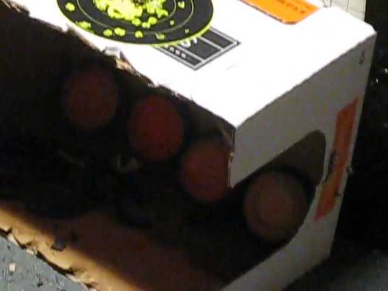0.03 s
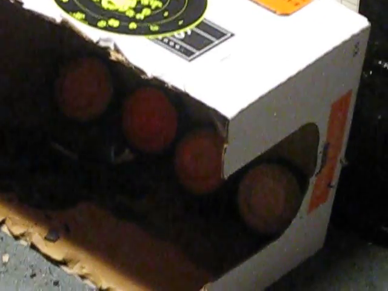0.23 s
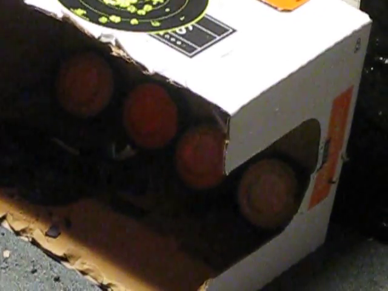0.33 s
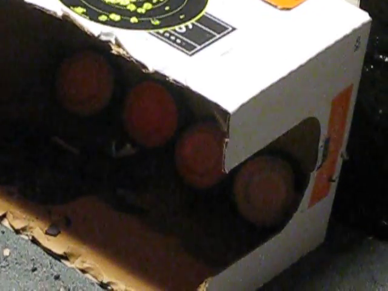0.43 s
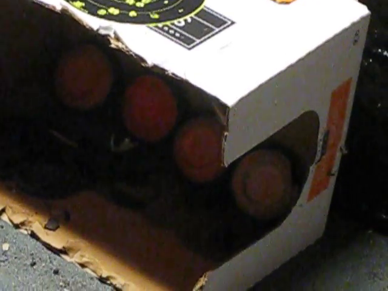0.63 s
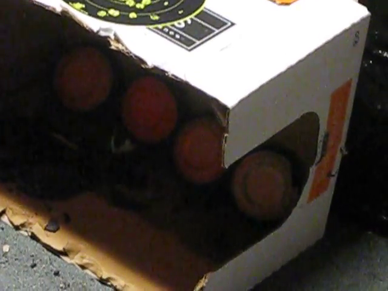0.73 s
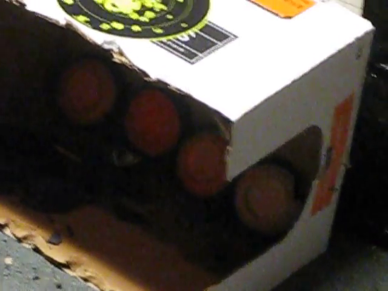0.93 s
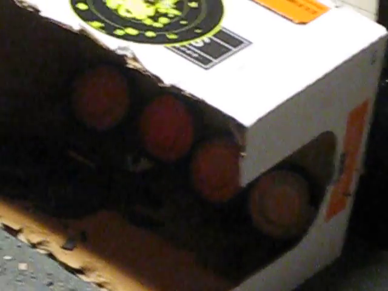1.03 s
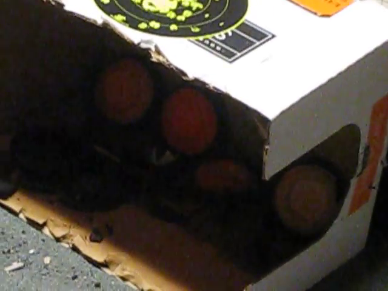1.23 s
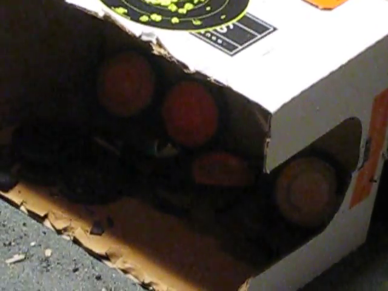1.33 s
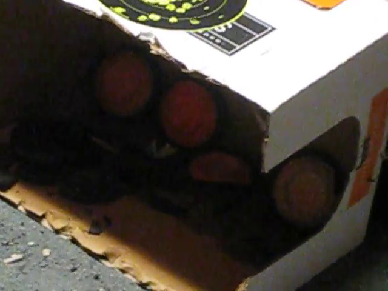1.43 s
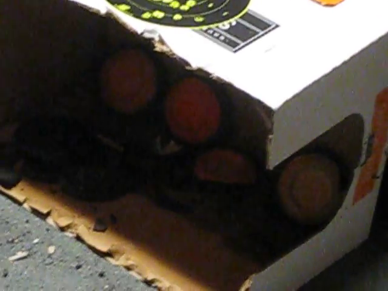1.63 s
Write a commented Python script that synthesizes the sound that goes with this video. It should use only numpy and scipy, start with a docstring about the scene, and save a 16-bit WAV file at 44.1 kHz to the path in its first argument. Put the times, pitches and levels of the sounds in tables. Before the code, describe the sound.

Far metal rings, then an air pistol snaps and hollow knocks and clay chips follow. A second shot brings clinks, a dropping disc and soft cardboard thuds, over low room hum, through a compressing camera microphone.

```python
"""A hard-walled room, where two air pistol shots are fired at clay targets in a cardboard box.
Far metal, a sum of decaying modes and noise, rings before the first shot. Each shot is a hammer click, a
noise blast, a low pulse and echoes. After each, filtered noise makes pieces tumble, knock and tick, and
clay clinks by its modes; after the second a clay disc drops with thuds of the cardboard floor's modes.
Room air and a low hum lie beneath. The camera's gain ducks under loud sound and recovers."""
import sys
import numpy as np
from scipy import signal
from scipy.fft import rfft, irfft, next_fast_len
from scipy.io import wavfile

SR = 44100
rng = np.random.default_rng(int(sys.argv[2]) if len(sys.argv) > 2 else 0)


def bounce(signal):
    """Save signal as a 16-bit WAV file at the path given by the first command-line argument."""
    frames = np.transpose(np.atleast_2d(signal))
    limited = np.clip(frames, -1, 1)
    pcm = np.round(limited * 32767).astype(np.int16)
    wavfile.write(sys.argv[1], SR, pcm)


N = 74970
T = np.arange(N) / SR  # time in seconds

# Bright colour of small hard contacts. Each row: frequency in Hz, relative level in dB.
TICK_SPECTRUM = [(1500, -13), (4000, -8), (6500, -3.5), (9500, -3.5), (13000, -1), (15000, -5),
                 (17500, -34)]


def amp(db):
    """Logarithmic level: decibels to amplitude gain."""
    return 10 ** (np.asarray(db) / 20)


def unit(x):
    """Normalisation: scaled to rms 1."""
    return x / np.sqrt(np.mean(x ** 2) + 1e-20)


def along(points, hz):
    """Logarithmic frequency scale: interpolates (Hz, value) points along it."""
    f, v = np.transpose(points)
    return np.interp(np.log(hz + 1), np.log(f + 1), v)


def filtered(x, response):
    """Convolution theorem: the spectrum of x times a response of frequency."""
    m = 2 * next_fast_len(N // 2 + 4096, True)  # padded
    return irfft(rfft(x, m) * response(np.fft.rfftfreq(m, 1 / SR)), m)[:N]


def coloured(x, spectrum):
    """Minimum phase: a causal filter of unit energy, found by folding the cepstrum."""
    def response(hz):
        log_gain = np.log(unit(amp(along(spectrum, hz))))
        cepstrum = irfft(log_gain)
        half = len(cepstrum) // 2
        cepstrum[1:half] *= 2
        cepstrum[half + 1:] = 0
        return np.exp(rfft(cepstrum))
    return filtered(x, response)


def shifted(spectrum, pitch):
    """Scaling: the same colour with every frequency times a factor."""
    return [(hz * pitch, db) for hz, db in spectrum]


def fade(t, t60):
    """Exponential decay: full level until t = 0, then 60 dB down per t60."""
    return np.exp(-np.log(1000) * np.clip(t / t60, 0, 4))


def burst(s, db, t60, hold=0):
    """Impulsive noise: a sudden start at s, an optional hold, then exponential decay."""
    return amp(db) * (T >= s) * fade(T - s - hold, t60) * rng.standard_normal(N)


def ring(s, modes, pitch=1):
    """Modal superposition: damped sinusoids (Hz, dB, t60) started at time s with random phases."""
    t = np.maximum(T - s, 0)
    total = 0
    for hz, db, t60 in modes:
        total += amp(db) * fade(t, t60) * np.sin(2 * np.pi * (hz * pitch * t + rng.random()))
    return (T >= s) * total


def room(x):
    """Diffuse reverberation: convolution with noise whose frequencies decay at their own speeds."""
    build_s = 0.0027
    # Decay of the room. Each row: frequency in Hz, t60 in seconds.
    decay_times = [(150, 1), (1000, 0.57), (3000, 0.74), (8000, 0.54), (15000, 0.27)]
    hz, t, z = signal.stft(rng.standard_normal(SR), SR, nperseg=256)
    envelope = fade(t, along(decay_times, hz)[:, None]) * (1 - np.exp(-t / build_s))
    tail = signal.istft(z * envelope, SR)[1]
    return signal.fftconvolve(x, tail / np.linalg.norm(tail))[:N]


def in_room(x, room_db):
    """Superposition of direct sound and the room's reverberation."""
    return x + amp(room_db) * room(x)


def in_box(x):
    """Reverberation of a small enclosure: direct sound plus quick reflections off cardboard walls."""
    t60, box_db, build_s = 0.19, -3, 0.0024
    tail = fade(T, t60) * (1 - np.exp(-T / build_s)) * rng.standard_normal(N)
    return x + amp(box_db) * signal.fftconvolve(x, tail / np.linalg.norm(tail))[:N]


def background():
    """Stationary sound: broadband noise of the room air and the steady tones of a low machine hum."""
    air_db = -46
    # Tones of the hum. Each row: frequency in Hz, rms level in dB.
    hum_tones = [(120, -54.5), (188, -52)]
    # Colour of the air. Each row: frequency in Hz, relative level in dB.
    air_spectrum = [(25, -32), (60, -11.5), (100, -16), (150, -3.5), (260, -3.5), (450, -4), (1000, -8.5),
                    (1600, -13.5), (2600, -12.5), (6500, -22), (10000, -22.5), (16000, -36)]
    hum = 0
    for hz, db in hum_tones:
        hum += amp(db) * np.sqrt(2) * np.sin(2 * np.pi * (hz * T + rng.random()))
    return hum + amp(air_db) * coloured(rng.standard_normal(N), air_spectrum)


def metal():
    """Modal vibration of far metal: clear modes, a crowd of weak ones and a hiss, with a blurred attack."""
    t60, rise_s = 0.51, 0.0058  # t60 of crowd and hiss, rise time constant
    modes_db, crowd_db, wash_db = -9.5, -22.5, -3  # crowd_db is for each weak mode
    # Blows; the first still rings as the scene opens. Each row: start in seconds, level in dB.
    blows = [(-.14, -16), (.190, -22), (.215, -11)]
    # Clear modes. Each row: frequency in Hz, relative level in dB, t60 in seconds.
    clear_modes = [(853, -3.5, 0.42), (2107, -3, 0.21), (2290, 0, 0.13), (2590, 2, 0.48), (2750, 4.5, 0.15),
                   (3270, -4, 0.13), (3581, -16, 0.23), (3686, -6, .35), (3870, -5, .5), (4650, -13.5, .35),
                   (5385, 6, 0.1), (5600, -4, 0.33), (9500, -0.5, 0.2)]
    # Colour of crowd and hiss. Each row: frequency in Hz, relative level in dB.
    wash_spectrum = [(180, -40), (300, -44), (725, -15), (828, -11.5), (1040, -18), (1230, -10),
                     (3830, -2.5), (7820, -10.5), (12100, -18.5), (15200, -25), (16000, -87)]
    crowd_hz = np.geomspace(900, 14500, 60) * (1 + .02 * rng.standard_normal(60))
    crowd = ring(0, [(hz, crowd_db, t60) for hz in crowd_hz])
    out = np.zeros(N)
    for s, db in blows:
        rise = 1 - np.exp(-np.maximum(T - s, 0) / rise_s)
        delayed_crowd = amp(db) * np.interp(T - s, T, crowd, left=0)
        wash = coloured(burst(s, db, t60) + delayed_crowd, wash_spectrum)
        clear = amp(db + modes_db) * ring(s, clear_modes)
        out += rise * (amp(wash_db) * wash + clear)
    return out


def patter(start, end):
    """Random point process: many little contacts as noise, scaled to rms 1 before gating."""
    rate_per_s, t60, edge_s, scatter_db = 400, 0.015, 0.037, 4
    chance = rng.random(N)
    size = amp(scatter_db * rng.standard_normal(N))
    contacts = (chance < rate_per_s / SR) * size ** 2
    power = signal.lfilter([1], [1, -fade(1 / SR, t60) ** 2], contacts)
    gate = np.clip(np.minimum(T - start, end - T) / edge_s + .5, 0, 1)  # half open at start and end
    return gate * unit(np.sqrt(np.abs(power)) * rng.standard_normal(N))


def tumbling():
    """Dense random impacts: pieces rattle down in the box, with fine chips among them."""
    # Each row: start in seconds, end in seconds, level in dB, level of the fine chips in dB, pitch factor.
    tumbles = [(0.468, 0.52, -32, -45, 0.98), (0.492, 0.567, -23.5, -34, 1.18),
               (0.555, 0.623, -25, -30, 0.94), (0.633, 0.684, -24.5, -42, 0.88),
               (1.219, 1.289, -28.5, -32, 0.95), (1.282, 1.344, -29, -35, 1.22),
               (1.346, 1.405, -49, -43, 1.2)]
    # Colour of pieces. Each row: frequency in Hz before the pitch factor, relative level in dB.
    piece_spectrum = [(90, -26.5), (150, -14), (330, -13.5), (560, -4), (800, -0.5), (1100, -1.5),
                      (1700, -7.5), (3300, -18.5), (7000, -31), (11000, -36)]
    pieces, chips = 0, 0
    for start, end, db, chips_db, pitch in tumbles:
        pieces += amp(db) * coloured(patter(start, end), shifted(piece_spectrum, pitch))
        chips += amp(chips_db) * patter(start, end)
    return in_room(in_box(pieces + coloured(chips, TICK_SPECTRUM)), room_db=-10.5)


def thuds():
    """Plate resonance: the cardboard floor booms in its modes and rustles under the falling disc."""
    rustle_t60, rustle_db = 0.1, -2.5
    # Soft thuds. Each row: start in seconds, level in dB.
    landings = [(1.234, -26), (1.296, -29), (1.317, -29.5), (1.359, -30.5), (1.423, -31), (1.522, -39),
                (1.668, -40)]
    # Modes of the cardboard floor. Each row: frequency in Hz, relative level in dB, t60 in seconds.
    floor_modes = [(166, -6, 0.091), (247.6, 3.5, 0.096), (315, -5, 0.054)]
    # Colour of the rustle. Each row: frequency in Hz, relative level in dB.
    rustle_spectrum = [(40, -18), (110, -11), (170, -6), (250, -4.5), (340, -7), (450, -20), (800, -25),
                       (2000, -42)]
    boom, rustle = 0, 0
    for s, db in landings:
        boom += amp(db) * ring(s, floor_modes)
        rustle += burst(s, db + rustle_db, rustle_t60)
    return in_room(boom + coloured(rustle, rustle_spectrum), room_db=-15)


def clinks():
    """Excitation and resonance: clay on clay makes a gritty contact and a brief ring of modes."""
    grit_t60, grit_db, ring_db = 0.036, 1.5, -6
    # Contacts. Each row: start in seconds, level in dB, pitch factor of the modes.
    clay_contacts = [(.716, -34, 0.7), (0.754, -28.5, .87), (.846, -34, 0.9), (1.331, -15, 1),
                     (1.338, -15.5, 0.9), (1.386, -35.5, 0.74)]
    # Clay modes. Each row: frequency in Hz before the pitch factor, relative level in dB, t60 in seconds.
    clay_modes = [(2850, -8, 0.04), (3260, -6, 0.058), (3330, -7, 0.21), (3600, -28, 0.15),
                  (4160, -6, 0.027), (5792, 5, 0.059), (6010, -2, 0.049), (6480, -14, 0.034)]
    # Colour of the grit. Each row: frequency in Hz, relative level in dB.
    grit_spectrum = [(1500, -45), (2600, 9), (3300, 19), (4600, 1.5), (5900, 8), (7000, 5.5), (12000, -4),
                     (16000, -31)]
    direct = 0
    for s, db, pitch in clay_contacts:
        direct += amp(db + ring_db) * ring(s, clay_modes, pitch)
        direct += coloured(burst(s, db + grit_db, grit_t60), grit_spectrum)
    return in_room(in_box(direct), room_db=-27)


def ticks():
    """Small bodies resonate high: chips land with bright noise, each ringing at three random pitches."""
    ring_db, ring_t60 = -9, 0.02
    # Landings of chips. Each row: start in seconds, level in dB, t60 of the noise in seconds.
    landings = [(.5897, -43, 0.026), (0.6323, -24.5, 0.045), (.711, -25.5, 0.049), (0.7176, -21.5, 0.041),
                (0.7382, -16.5, 0.0065), (0.751, -21.5, 0.038), (0.7783, -25, .05), (0.8363, -30, 0.015),
                (0.8988, -37, 0.054), (1.0473, -21, .02), (1.2648, -22.5, 0.13), (1.3405, -28, 0.018),
                (1.3865, -21, 0.041), (1.4, -53, 0.022), (1.4723, -34, 0.061), (1.547, -33.5, 0.023),
                (1.5728, -29.5, 0.026)]
    rings, contacts = 0, 0
    for s, db, t60 in landings:
        modes = [(hz, db + ring_db, ring_t60) for hz in rng.uniform(9500, 14500, size=3)]
        rings += ring(s, modes)
        contacts += burst(s, db, t60)
    return in_room(in_box(rings + coloured(contacts, TICK_SPECTRUM)), room_db=-9)


def knocks():
    """Impact excitation: hard pieces give the box a sharp push and brief chatter; it answers hollowly."""
    click_db = 15.5
    # Heavy pieces sound lower. Each row: start in seconds, level in dB, t60 in seconds, pitch factor.
    hits = [(0.496, -27, 0.023, 0.52), (.505, -15.5, .05, 0.99), (0.633, -18.5, 0.044, 0.74),
            (.643, -18, 0.019, .7), (0.7497, -8.5, 0.047, 0.97), (.918, -17.5, 0.062, 0.91),
            (1.0427, -17, 0.041, 1.03), (1.0893, -12, 0.022, 0.81), (1.328, -26, 0.12, 0.43),
            (1.342, -16, 0.052, 0.54), (1.357, -12, 0.035, 0.64), (1.4458, -18, 0.051, 0.93),
            (1.503, -27, 0.056, 0.82), (1.634, -38.5, 0.08, 0.69)]
    # Colour of a knock. Each row: frequency in Hz before the pitch factor, relative level in dB.
    knock_spectrum = [(120, -43), (300, -37), (480, -10.5), (720, -7.5), (1050, 1), (1650, -2.5),
                      (2200, -5.5), (3100, -13), (4200, -25), (6500, -28), (10000, -63)]
    direct = np.zeros(N)
    for s, db, t60, pitch in hits:
        contact = burst(s, db, t60)
        contact[int(s * SR)] += amp(db + click_db)  # one-sample push
        direct += coloured(in_box(contact), shifted(knock_spectrum, pitch))
    return in_room(direct, room_db=-17)


def pistol():
    """Impulsive gas release: hammer click, blast with a low push, near-surface slap and room tail."""
    hammer_lead_s, hammer_db, hammer_t60 = .0052, -15, 0.1  # it falls just before the valve opens
    snap_db, snap_t60 = -13, 0.0021  # the hammer's first contact
    blast_hold_s, blast_t60 = 0.0039, 0.04
    push_s, push_db = 0.0012, -18  # low pressure pulse of the escaping gas
    echo_s, echo_db, echo_t60, room_db = .0125, -4, 0.019, -6.5
    # Each row: start of the blast in seconds, level in dB.
    shots = [(0.3353, 0.5), (1.0849, 2)]
    # Colours of the hammer, the blast and the shot in the room.
    # Each row: frequency in Hz, relative level in dB.
    hammer_spectrum = [(120, -42), (200, -12), (869, -11), (2200, -0.5), (5680, -13.5), (7500, -33),
                       (10900, -6.5), (17000, -25)]
    blast_spectrum = [(25, -3), (60, -7.5), (250, -8.5), (650, -4.5), (1000, -4.5), (2200, -5.5),
                      (3100, -2), (4000, -2), (6000, -1.5), (8600, -1.5), (11000, -0.5), (16500, -14.5),
                      (18000, -78)]
    tail_spectrum = [(100, -22), (300, -8), (600, -1), (2000, 2.5), (5000, -0.5), (10000, -1), (16000, 5)]
    out = np.zeros(N)
    for s, db in shots:
        fall = s - hammer_lead_s
        hammer = coloured(burst(fall, db + hammer_db, hammer_t60), hammer_spectrum)
        snap = coloured(burst(fall, db + snap_db, snap_t60), TICK_SPECTRUM)
        gas = burst(s, db, blast_t60, blast_hold_s)
        slap = burst(s + echo_s, db + echo_db, echo_t60)
        blast = coloured(gas + slap, blast_spectrum)
        push = amp(db + push_db) * (T >= s) * np.exp(-np.maximum(T - s, 0) / push_s)
        tail = amp(room_db) * coloured(room(blast), tail_spectrum)
        out += hammer + snap + blast + push + tail
    return out


def scene():
    """Superposition: every source adds at one microphone."""
    far = background() + metal()
    box = tumbling() + thuds() + clinks() + ticks() + knocks()
    return (far + box + pistol())[None]


def record(dry):
    """Dynamic compression in the camera, with a treble notch, soft clipping and a band limit."""
    notch_hz, notch_half_width_hz, top_hz = 7860, 1000, 18000
    duck_above_db, duck_share = -17, 0.48  # dB of ducking per dB above the threshold
    attack_s, recover_db_per_s = 0.003, 33.5
    ceiling = 1.0

    def notch(hz):
        detuning = notch_hz ** 2 - hz ** 2
        return detuning / (detuning + 2j * hz * notch_half_width_hz)

    x = filtered(dry[0], notch)
    smoothed = signal.lfilter([1], [1, -np.exp(-1 / (attack_s * SR))], x ** 2)
    level_db = 10 * np.log10(np.abs(smoothed) / (attack_s * SR) + 1e-12)
    wanted_db = duck_share * np.maximum(level_db - duck_above_db, 0)
    # A running maximum on a rising ramp lets the ducking recover at a steady rate.
    ramp_db = recover_db_per_s * T
    duck_db = np.maximum.accumulate(wanted_db + ramp_db) - ramp_db
    x = x * amp(-duck_db)
    x = x / (1 + np.abs(x / ceiling) ** 6) ** (1 / 6)  # soft clipping
    return filtered(x, lambda hz: hz < top_hz)[None]


dry = scene()
out = record(dry)
bounce(out)
```